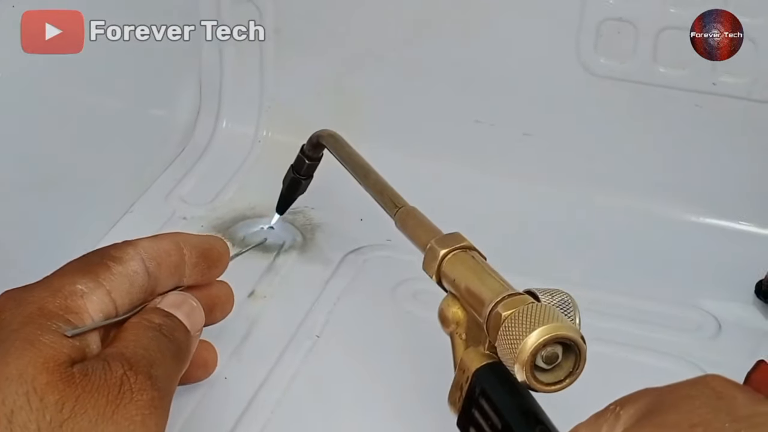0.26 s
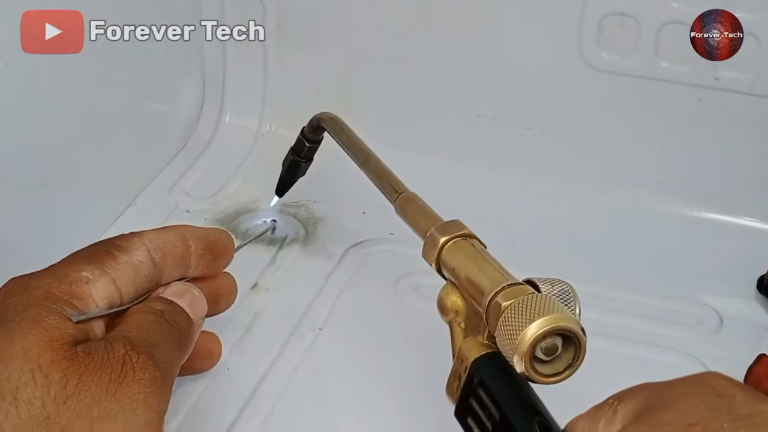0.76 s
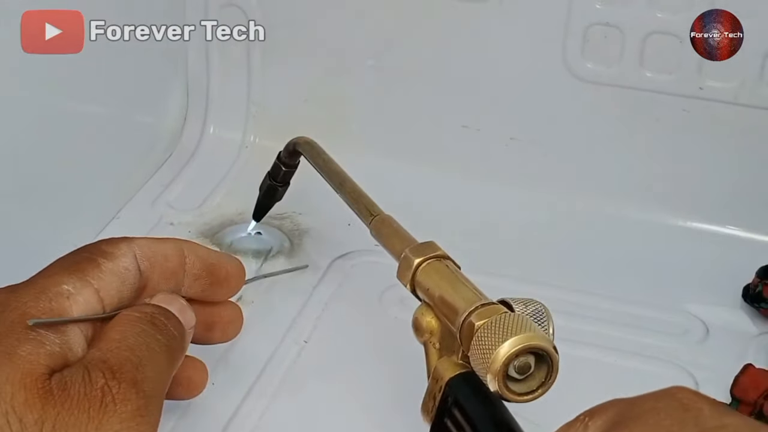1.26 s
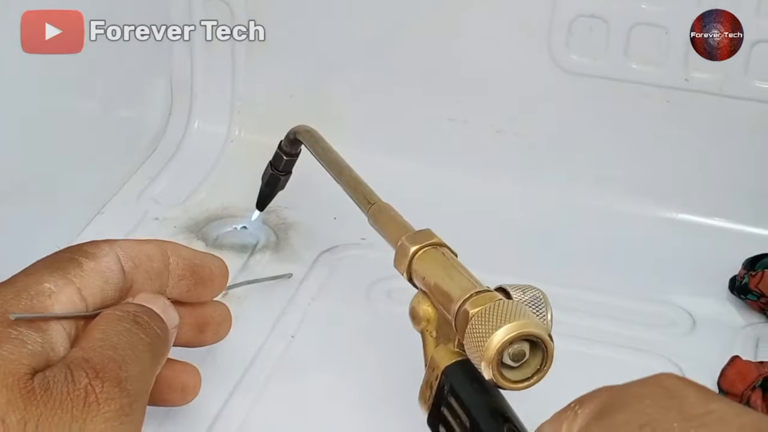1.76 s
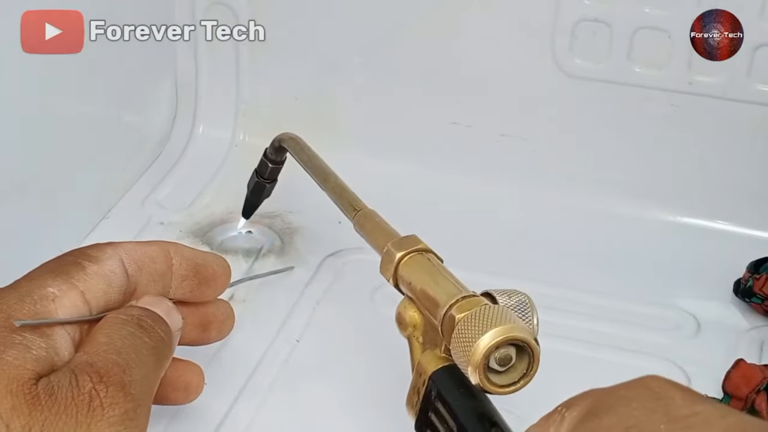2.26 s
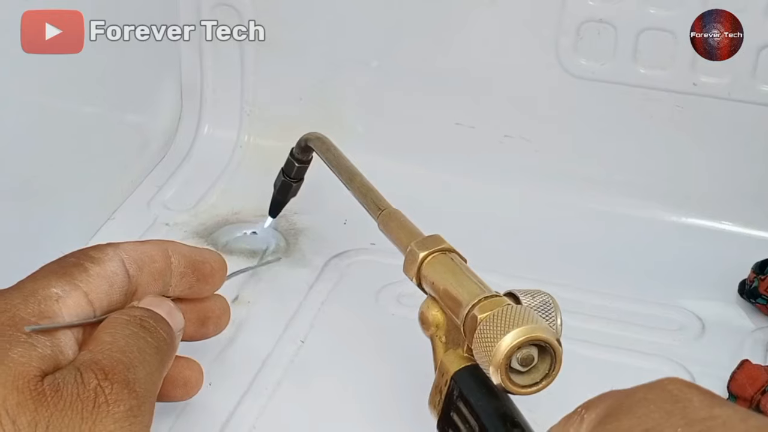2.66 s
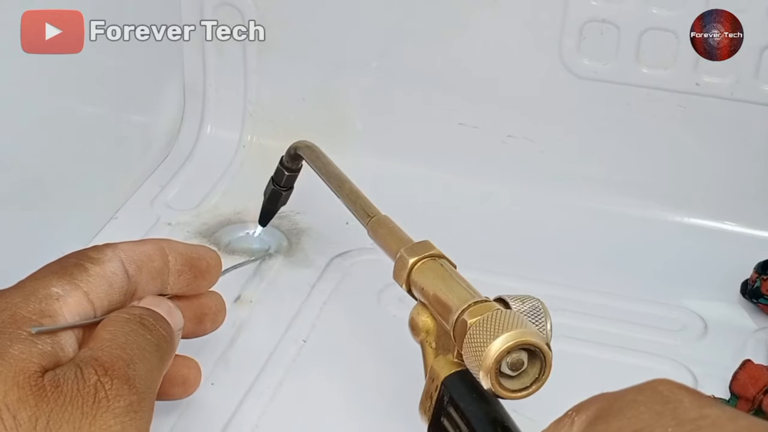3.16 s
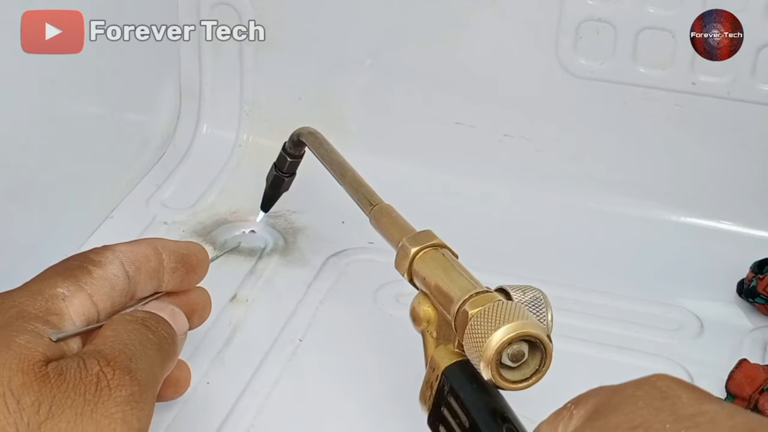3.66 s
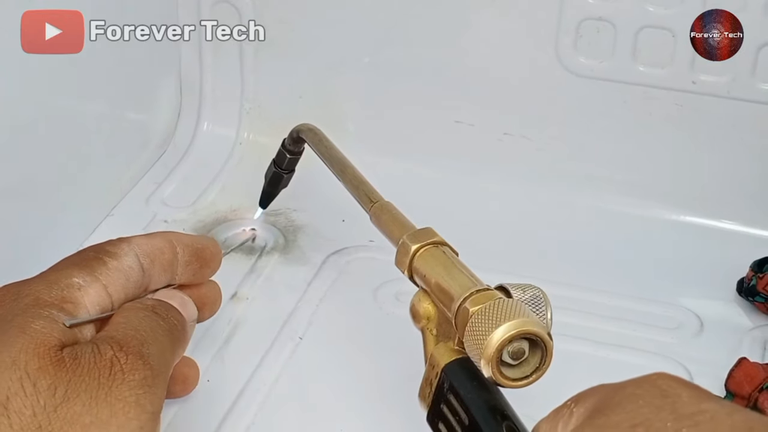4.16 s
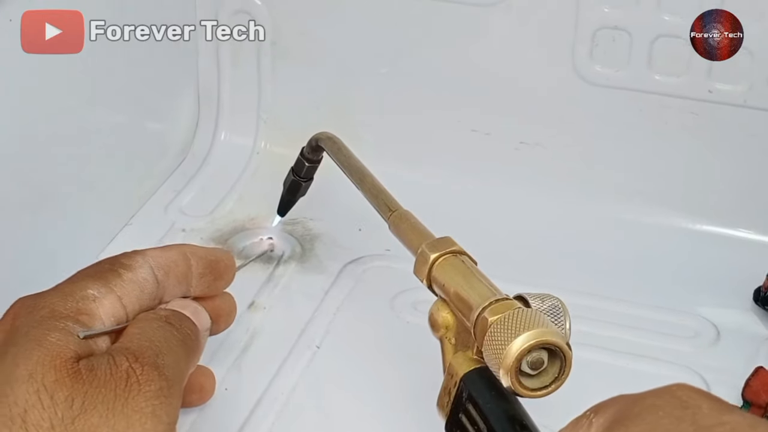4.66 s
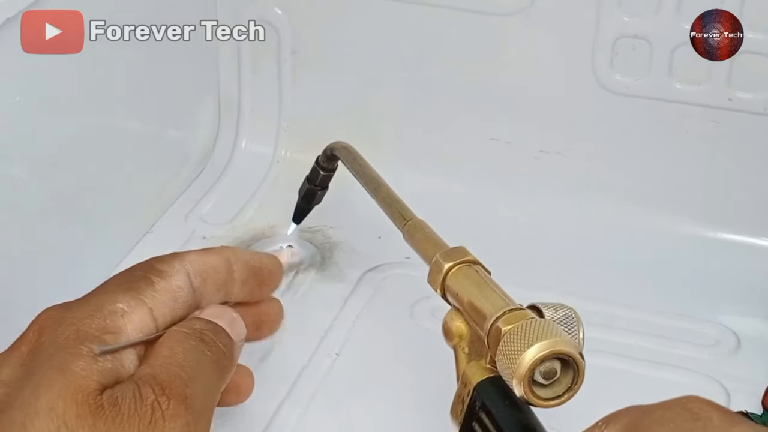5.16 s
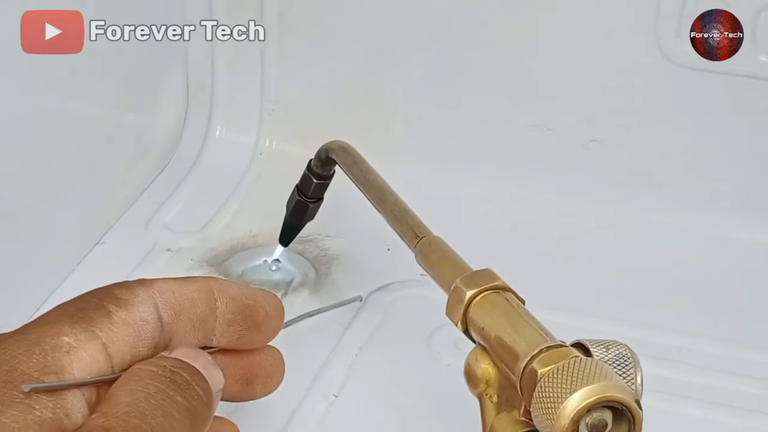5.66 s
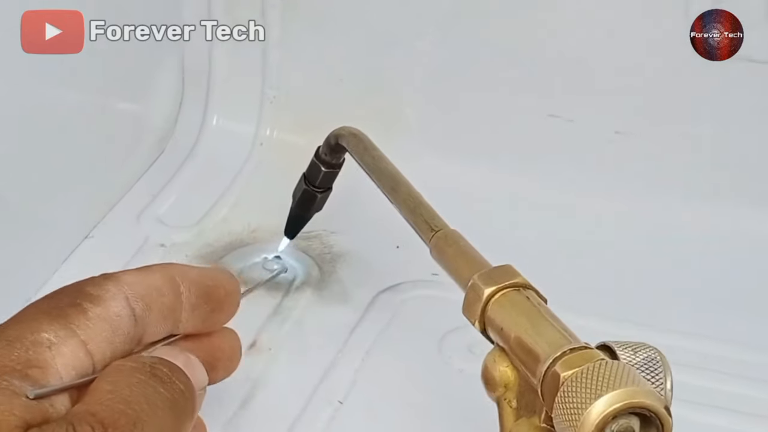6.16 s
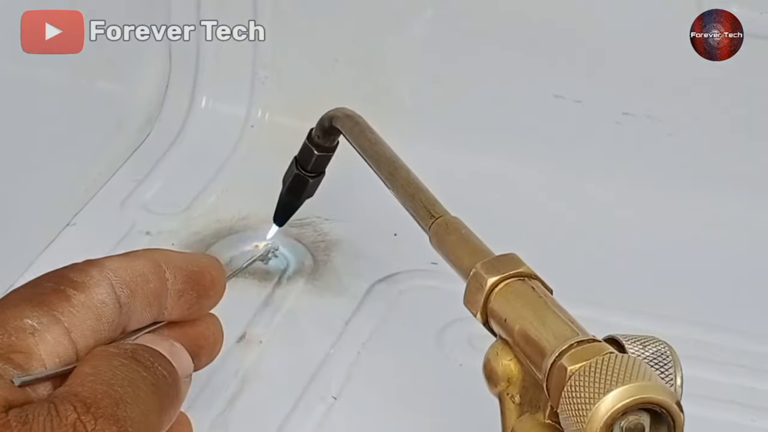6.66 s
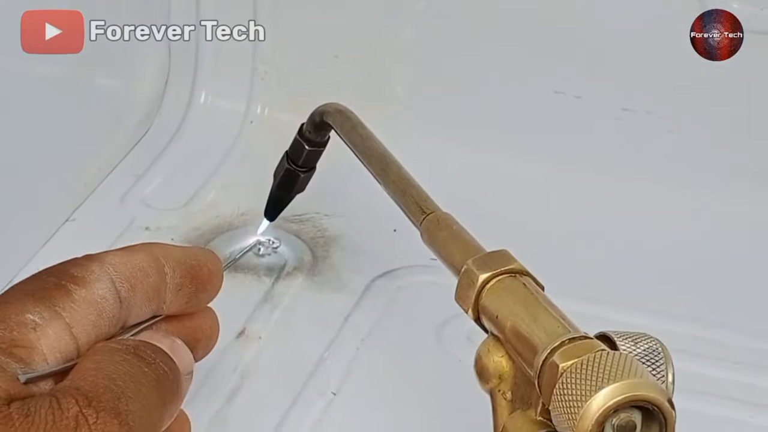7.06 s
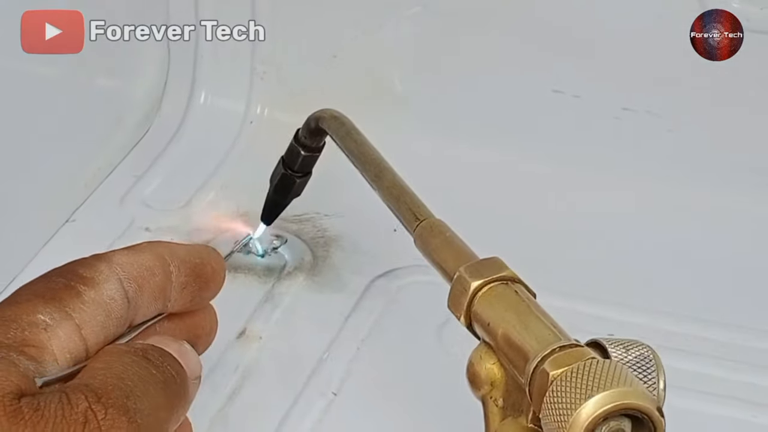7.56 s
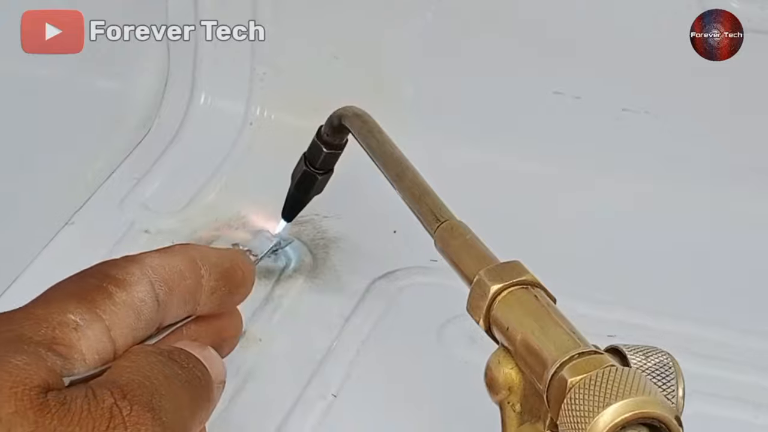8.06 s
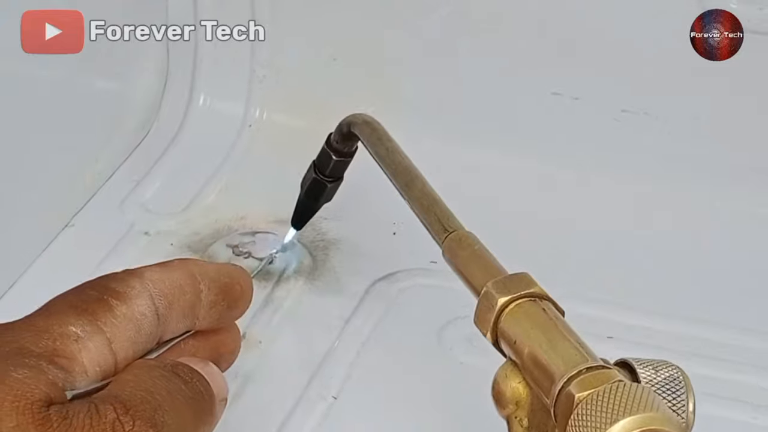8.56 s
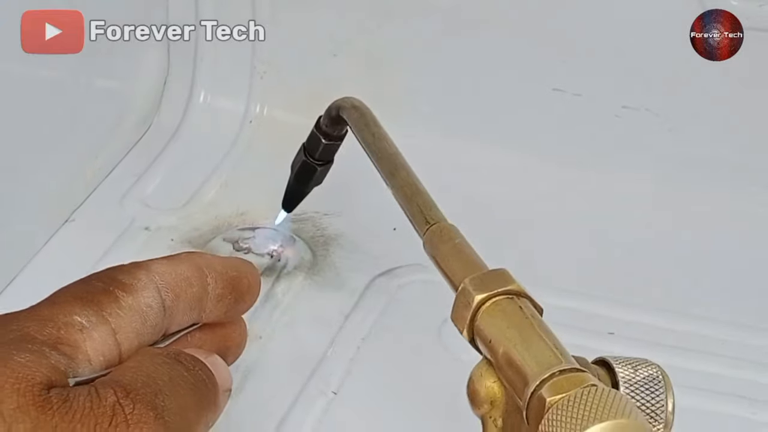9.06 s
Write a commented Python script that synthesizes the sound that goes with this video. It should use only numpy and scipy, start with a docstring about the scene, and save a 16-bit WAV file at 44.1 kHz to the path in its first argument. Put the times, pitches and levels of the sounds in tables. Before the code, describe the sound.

A gas brazing torch burns close to the microphone inside an open metal appliance cabinet. The jet gives a steady, bright hiss with a thin, very high whistle on top. Underneath, the flame flutters in quick, uneven puffs that boom softly in the cabinet. Late on, the flame falters briefly with a small spit as the filler rod melts, then carries on as before.

```python
"""A gas brazing torch plays on a spot of metal inside an open appliance cabinet, close by.
The gas jet hisses steadily, with a thin whistle on top. The flame flutters against the metal in quick,
uneven puffs that boom in the cabinet, and falters once with a spit as the filler rod melts.
Echoes from the walls shift as the hand drifts. Jet and flame are both noise, shaped by the
pitches at which the torch head and the cabinet ring."""
import sys
import numpy as np
from scipy import signal
from scipy.fft import rfft, irfft
from scipy.io import wavfile

SR = 44100
rng = np.random.default_rng(int(sys.argv[2]) if len(sys.argv) > 2 else 0)


def master(y):
    """Save y as 16-bit WAV."""
    cut = np.clip(np.atleast_2d(y).T, -1, 1)
    pcm = np.round(cut * 32767)  # scale
    wavfile.write(sys.argv[1], SR, pcm.astype(np.int16))


N = 410130
TIME = np.arange(N) / SR
HZ = np.fft.rfftfreq(8192, 1 / SR)

# How the cabinet's boom rises and falls. Each row: time in seconds, relative level in dB.
BOOM_LEVELS = [(0, -33), (0.3, -39), (0.55, -42), (1.1, -37.5), (3.3, -37), (3.75, -46), (4.35, -36),
               (4.75, -42.9), (5.2, -35.5), (5.7, -43.5), (6.2, -37), (7.0, -41), (7.4, -35), (7.8, -41),
               (9.3, -40)]


def from_db(db):
    """Turns decibels into a gain."""
    return 10 ** (np.asarray(db) / 20)


def add(mix, start_s, sound):
    """Mixes a sound in at its start time."""
    part = mix[max(round(start_s * SR), 0):][:len(sound)]
    part += sound[:len(part)]


def curve(rows):
    """Joins (time, value) rows with straight lines, giving a value for every sample."""
    return np.interp(TIME, *np.transpose(rows))


def swing(rows):
    """How far a curve lies above or below its own average."""
    return curve(rows) - np.mean(curve(rows))


def wander(rate_hz):
    """A random wobble of typical size 1, with little motion faster than rate_hz."""
    hz = np.fft.rfftfreq(N, 1 / SR)
    wobble = irfft(rfft(rng.standard_normal(N)) / (1 + (hz / rate_hz) ** 4), N)
    return wobble / wobble.std()


def below(edge_hz, steepness):
    """The share of power kept at each frequency: near 1 below the edge, near 0 above it."""
    return 1 / (1 + (HZ / edge_hz) ** steepness)


def bell(hz, centre_hz, width_hz, height_db):
    """One peak or dip in the tone, in dB at each frequency."""
    return height_db / (1 + (2 * (hz - centre_hz) / width_hz) ** 2)


def ringing(tone, share):
    """How cabinet and torch head ring after one click, coloured by a share of a source's tone."""
    # Peaks and dips of the air in the cabinet. Each row: centre in Hz, width in Hz, height in dB.
    cabinet_peaks = [(129,20,9), (304,63,-4), (449,20,4.5), (545.4,43.4,14), (651,67,14), (738,23,-4.5),
                     (784.3,192,15), (859,39,4.5), (952,16,-6), (1050,48,9.5), (1148,28,5.5), (1261,46,10),
                     (1447,110,-9), (1565,38,5.5), (1803,18,7.5), (2135,12,-6.5), (2293,41,-19)]
    # Peaks and dips of the torch head. Each row: centre in Hz, width in Hz, height in dB.
    nozzle_peaks = [(2627,120,15), (3062,202,-10), (3240,230,10), (3455,120,8), (3707,62,7.5), (3933,95,13),
                    (4207,340,9), (4410,150,11), (4605,55,8.5), (4770,65,7.5), (4880,59,-7), (4965,50,3.5),
                    (5170,260,3), (5400,80,-7), (5814,186,-4.5), (6020,340,-3.5), (6640,45,-5),
                    (7100,153,3.5), (7445,140,7), (8390,159,-9), (8420,440,7.5), (9400,111,3.5),
                    (11570,241,3.6), (11930,159,-4), (12330,81,5), (14000,358,4), (14593,138,3.9)]
    tone_hz, tone_db = np.transpose(tone)
    db = np.interp(np.log(HZ + 1), np.log(tone_hz), tone_db)
    db += sum(bell(HZ, *peak) for peak in cabinet_peaks + nozzle_peaks)
    log_gain = np.log(from_db(db) * np.sqrt(share) + 1e-5)
    mirrored = np.concatenate([log_gain, log_gain[-2:0:-1]])
    spectrum = np.exp(np.conj(signal.hilbert(mirrored)))  # puts all the ringing after the click
    return np.fft.ifft(spectrum).real[:len(HZ) // 2]


def turbulence(ring, band_hz, strength=1):
    """Swirling gas: noise sent through a ring, scaled to a typical size of 1 inside the band."""
    spectrum = rfft(rng.standard_normal(N) * strength) * rfft(ring, N)
    hz = np.fft.rfftfreq(N, 1 / SR)
    in_band = (hz > band_hz[0]) & (hz < band_hz[1])
    return irfft(spectrum, N) / irfft(spectrum * in_band, N).std()


def gas_jet(hiss_db=-25, fizz_db=-0.3, flicker_db=0.91):
    """Gas rushes from the nozzle: a hiss, a finer fizz and a fuzzy whistle flicker together."""
    # The jet's overall tone. Each row: frequency in Hz, relative level in dB.
    jet_tone = [(300, -42.5), (1300, -21.5), (1800, -16.5), (2450, -21), (3000, -19), (4200, -22.5),
                (5500, -5), (6700, -14), (7700, -20), (8900, -11.5), (11000, -19.5), (13900, -23.5),
                (14700, -15), (15450, -12)]
    # The fizz swells as jet and rod move over the spot. Each row: time in seconds, relative level in dB.
    fizz_levels = [(0, -32.9), (0.5, -30.6), (0.75, -33), (1.35, -31), (2.65, -33.5), (3.1, -30.5),
                   (3.6, -32.5), (5.7, -30.5), (5.95, -33.6), (6.3, -29.5), (6.9, -33), (8.2, -32.5),
                   (8.95, -30.5), (9.3, -32)]
    # How the whistle rises and falls. Each row: time in seconds, relative level in dB.
    whistle_levels = [(0, -33.0), (0.8, -30.5), (1.7, -35.2), (1.9, -30.6), (2.6, -32), (3.4, -35.4),
                      (3.65, -30.5), (4.7, -30), (5.9, -35.1), (6.3, -29.5), (8.1, -33.5), (9.3, -32)]
    under_fizz, under_whistle = below(7060, steepness=30), below(14500, steepness=100)
    hiss = turbulence(ringing(jet_tone, under_fizz), band_hz=(3000, 7200))
    fizz_ring = ringing(jet_tone, under_whistle * (1 - under_fizz))
    fizz = turbulence(fizz_ring, band_hz=(7500, 14000), strength=from_db(0.5 * wander(33)))
    whistle_ring = ringing(jet_tone, 1 - under_whistle)
    whistle = turbulence(whistle_ring, band_hz=(14300, 15500), strength=from_db(wander(45)))
    hiss *= from_db(hiss_db + 0.2 * swing(fizz_levels)) * falter(lull_db=-0.5, spit_db=-3)
    fizz *= from_db(fizz_db + curve(fizz_levels)) * falter(lull_db=-3.5, spit_db=4)
    whistle *= from_db(curve(whistle_levels)) * falter(lull_db=-4, spit_db=11)
    return (hiss + fizz + whistle) * from_db(flicker_db * wander(22))


def echo_pattern(hz, times, width_hz, length_s):
    """Many echoes add up to a random pattern of strength and phase, smooth over pitch and time."""
    blur = np.exp(-0.5 * ((hz - hz.mean()) / width_hz) ** 2
                  - 0.5 * ((times - times.mean()) / length_s) ** 2)
    real, imaginary = rng.standard_normal((2, *blur.shape))
    pattern = np.fft.ifft2(np.fft.fft2(real + 1j * imaginary) * np.fft.fft2(blur))
    return pattern / pattern.std()


def moving_hand(sound):
    """The hand moves the nozzle: the gap to the metal changes pitch and the wall echoes drift."""
    # Tuning of the gap between nozzle and metal. Each row: time in seconds, its upper peak in Hz.
    gap_tuning = [(0, 6790), (.9, 6460), (1.6, 6670), (2.4, 6650), (3.3, 6730), (4.8, 6570), (5.9, 6580),
                  (7.2, 6560), (9.3, 6700)]
    # Echoes from the walls. Each row: frequency in Hz, strength compared with the direct sound.
    wall_echoes = [(2600, 0.13), (4200, 0.7), (5500, 0.34), (6300, 0.69), (15000, .65)]
    # Short waves shimmer as the hand trembles. Each row: frequency in Hz, strength compared likewise.
    shimmer = [(3000, .1), (5500, .17), (7500, .42), (12000, .62)]
    hz, times, spectra = signal.stft(sound, SR, nperseg=2048, noverlap=1536)
    hz = hz[:, None]
    upper_hz = np.interp(times, *np.transpose(gap_tuning))
    rise_hz = upper_hz - upper_hz.mean()
    # As the gap tunes upward, its lower peak fades and its upper one grows.
    lower_db = bell(hz, centre_hz=5600, width_hz=400, height_db=4 - 0.01 * rise_hz)
    upper_db = bell(hz, centre_hz=upper_hz, width_hz=360, height_db=12 + 0.0323 * rise_hz)
    drift_size = np.interp(hz, *np.transpose(wall_echoes))
    tremor_size = np.interp(hz, *np.transpose(shimmer))
    drift = drift_size * echo_pattern(hz, times, width_hz=15.7, length_s=0.7)
    tremor = tremor_size * echo_pattern(hz, times, width_hz=60, length_s=0.05)
    # Echoes add to the direct sound at some pitches and cancel it at others.
    echo_gain = abs(1 + drift + tremor) / np.sqrt(1 + drift_size ** 2 + tremor_size ** 2)
    shaped = spectra * echo_gain * from_db(lower_db + upper_db)
    return signal.istft(shaped, SR, nperseg=2048, noverlap=1536)[1][:N]


def flame(roar_db=-30, rumble_db=-42.5):
    """The flame roars and rumbles; each puff rings the cabinet and sets its deepest note booming."""
    # The flame's overall tone. Each row: frequency in Hz, relative level in dB.
    flame_tone = [(20, -41), (50, -33.5), (85, -23), (115, -8.5), (200, -11), (400, 1), (730, -25.5),
                  (900, -0.5), (1300, -22.5), (1800, -15.5), (2450, -24), (4000, -32.5), (8000, -49.5)]
    # How the roar rises and falls, puffs included. Each row: time in seconds, relative level in dB.
    roar_levels = [(0, -24.5), (0.55, -28.0), (1.0, -26.1), (3.4, -27), (4.1, -27.5), (4.55, -26),
                   (6.9, -28), (8.05, -26), (8.6, -27.5), (9.3, -27)]
    deep = below(235, steepness=6)
    body_ring, boom_ring = ringing(flame_tone, 1 - deep), ringing(flame_tone, deep)
    strength = flutter()
    roar = from_db(roar_db) * turbulence(body_ring, band_hz=(200, 1400), strength=strength)
    rumble = turbulence(boom_ring, band_hz=(80, 190), strength=strength)
    rumble *= from_db(rumble_db + swing(BOOM_LEVELS))
    for start_s, puff_db, boom_db in puff_schedule():
        burst = puff()
        add(roar, start_s, from_db(puff_db) * ring_out(burst, body_ring, span_s=0.012))
        add(rumble, start_s, from_db(boom_db) * ring_out(burst, boom_ring, span_s=0.051))
    return roar * from_db(swing(roar_levels)) * falter(lull_db=-5) + rumble * falter(lull_db=-2)


def flutter(flares_per_s=50, fade_s=0.005, calm=0.24):
    """The flame's strength: small flares jump up from a calm level at random and fade."""
    kicks = (rng.random(N) < flares_per_s / SR) * rng.uniform(0.47, 1, N)
    flares = signal.lfilter([1], [1, -np.exp(-1 / (fade_s * SR))], kicks)
    return calm + np.tanh(flares)


def puff_schedule(typical_gap_s=0.041, clear_s=0.022, count=300):
    """When and how hard the flame puffs: a few loud puffs, with unevenly paced softer ones between."""
    # The loudest puffs. Each row: start in seconds, relative levels of the puff and its boom in dB.
    loud_puffs = [(0.025, -12, -37), (0.368, -13, -30), (1.057, -12.5, -33), (1.415, -18, -33),
                  (1.664, -12.5, -32), (1.921, -12, -41), (2.407, -15, -34), (2.996, -11.5, -30),
                  (3.344, -13, -33), (3.85, -12.5, -32), (4.326, -15.5, -31), (4.51, -14, -42),
                  (4.605, -12.5, -38), (4.806, -13, -42), (5.224, -12, -37), (5.37, -14, -43),
                  (6.206, -16, -33), (7.266, -13, -48), (7.409, -12, -35), (7.941, -15, -37),
                  (8.052, -14.5, -35), (8.392, -13, -31), (9.244, -14, -36)]
    loud = np.asarray(loud_puffs) + [0, -8, -2]  # turns both levels down
    pace, size, depth = rng.standard_normal((count, 3)).T
    starts = np.cumsum(typical_gap_s * np.exp(0.33 * pace))
    puff_db = -25 + 0.7 * size
    boom_db = -41 + 3 * depth + np.interp(starts, TIME, swing(BOOM_LEVELS))
    soft = np.column_stack([starts, puff_db, boom_db])
    nearest_loud_s = abs(starts[:, None] - loud[:, 0]).min(axis=1)
    return np.vstack([loud, soft[(nearest_loud_s > clear_s) & (starts < TIME[-1])]])


def puff(peak_s=0.0054, sharpness=4, grit_db=3, grit_samples=49):
    """A pocket of gas lights: a ragged burst that swells and dies in about a hundredth of a second."""
    age = np.arange(SR // 15) / SR / peak_s
    noise, grit = rng.standard_normal((2, len(age)))
    grit = np.repeat(grit[:len(age) // grit_samples], grit_samples)
    swell = (age * np.exp(1 - age)) ** sharpness
    return noise * from_db(grit_db * grit) * swell


def ring_out(burst, ring, span_s):
    """A burst sent through a ring, with as much energy as a sound of power 1 lasting span_s."""
    sound = signal.fftconvolve(burst, ring)
    return sound / np.sqrt(np.sum(sound ** 2) / (span_s * SR))


def hump(centre_s, half_width_s):
    """A flat-topped bump of height 1 around one moment."""
    return 1 / (1 + ((TIME - centre_s) / half_width_s) ** 6)


def falter(lull_db, spit_db=0):
    """A layer's gain as the filler rod melts: one short lull, with a spit inside it."""
    lull = hump(centre_s=7.71, half_width_s=0.12)
    spit = hump(centre_s=7.68, half_width_s=0.035)
    return from_db(lull_db * lull + spit_db * spit)


def scene():
    """The hand-held jet and its flame, together in one channel."""
    return (moving_hand(gas_jet()) + flame())[None]


def record(dry):
    """Cuts away the very highest treble."""
    cutoff_hz = 15520
    lowpass = signal.firwin(1023, cutoff_hz, window=("kaiser", 9), fs=SR)
    return signal.oaconvolve(dry, lowpass[None], "same")


dry = scene()
out = record(dry)
master(out)
```